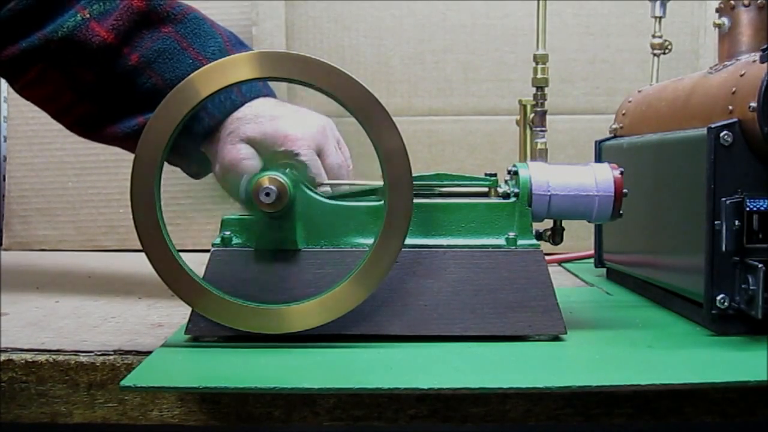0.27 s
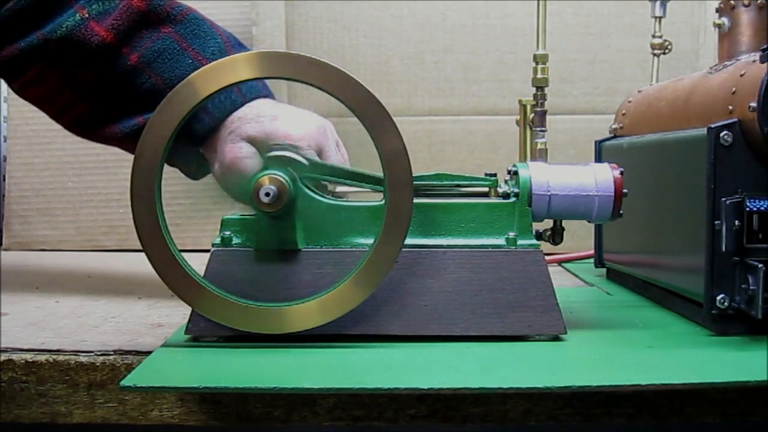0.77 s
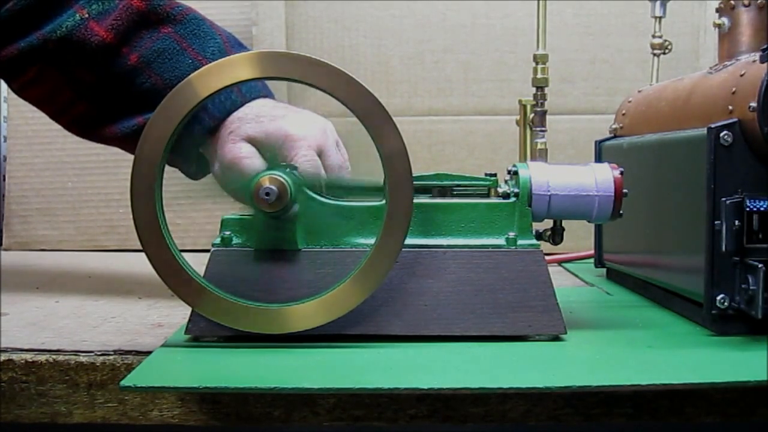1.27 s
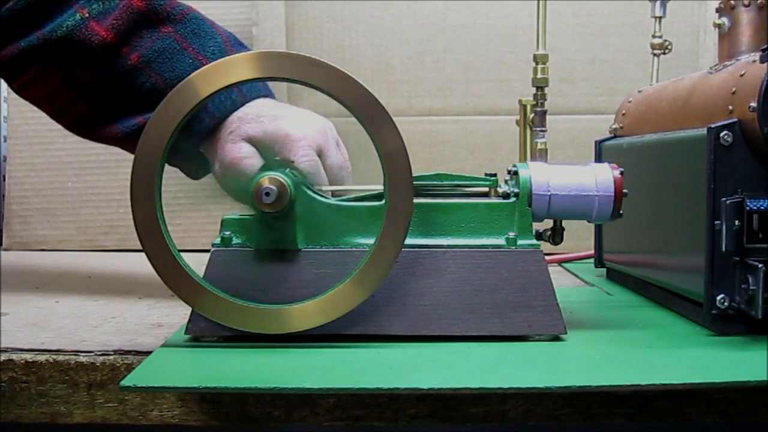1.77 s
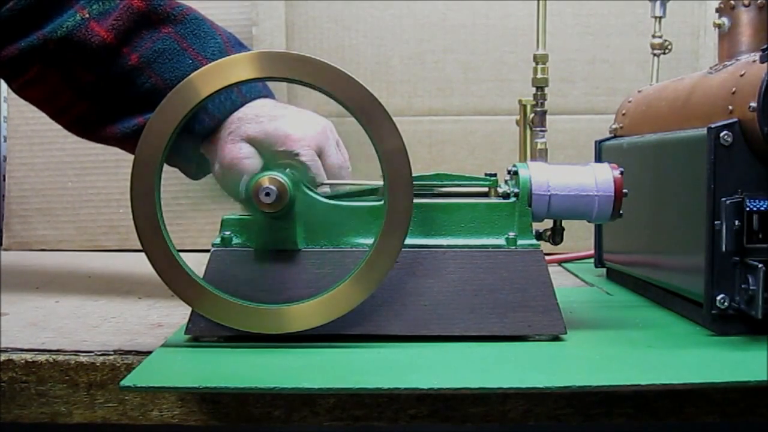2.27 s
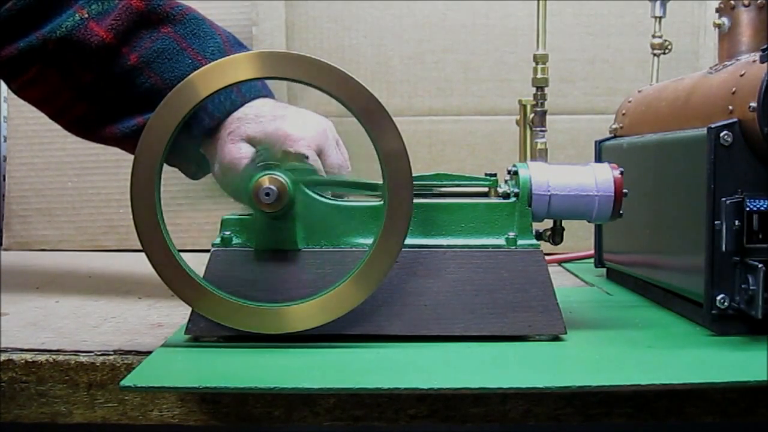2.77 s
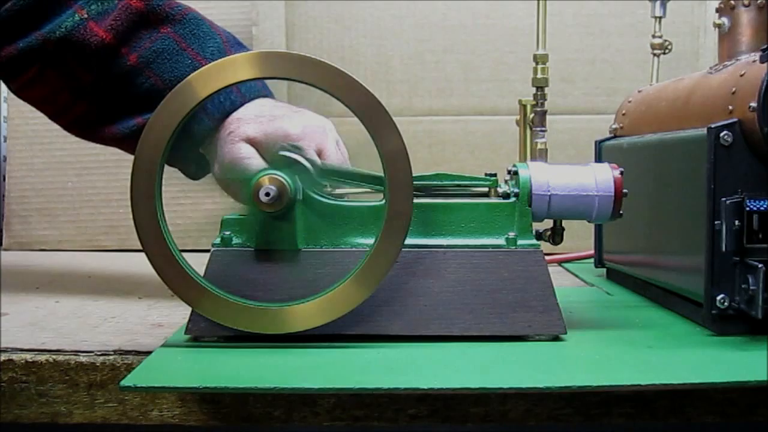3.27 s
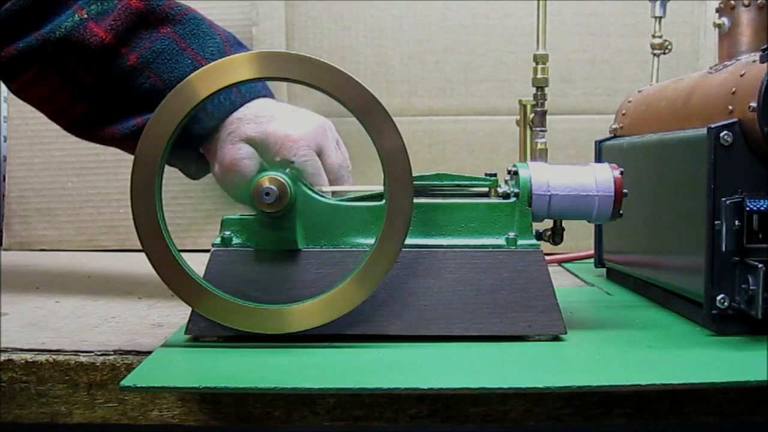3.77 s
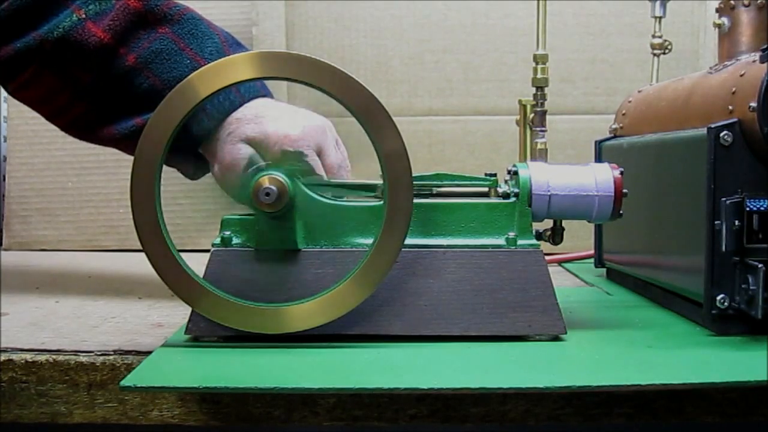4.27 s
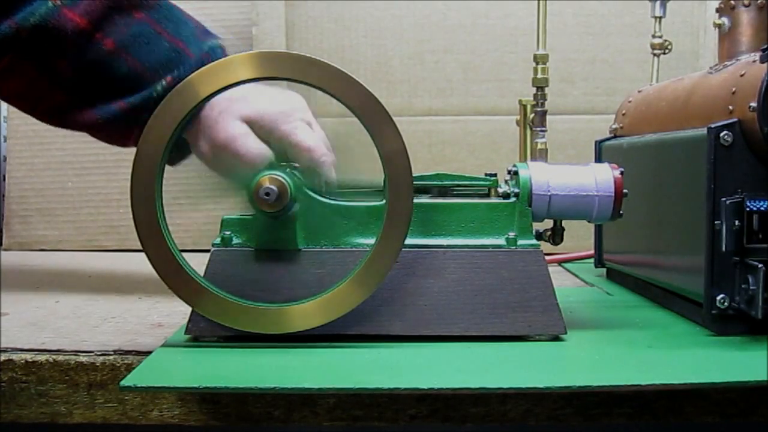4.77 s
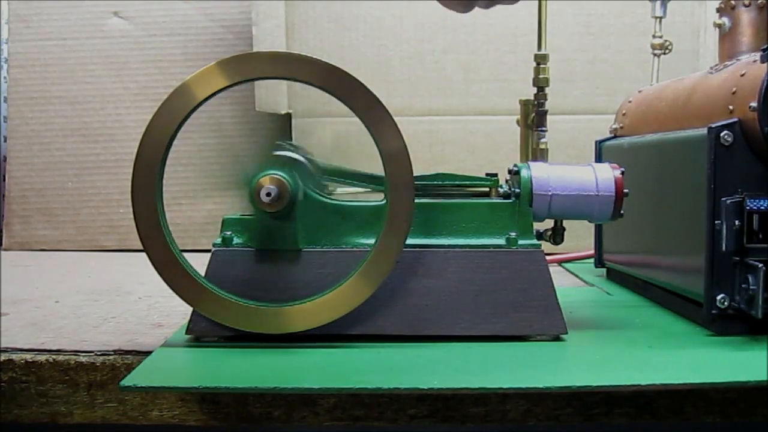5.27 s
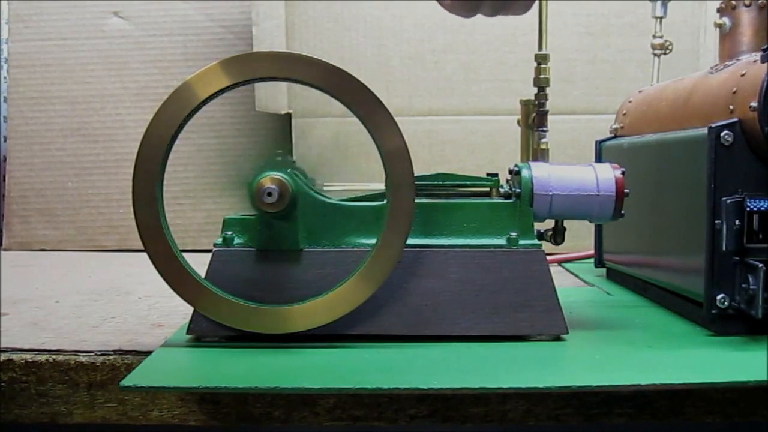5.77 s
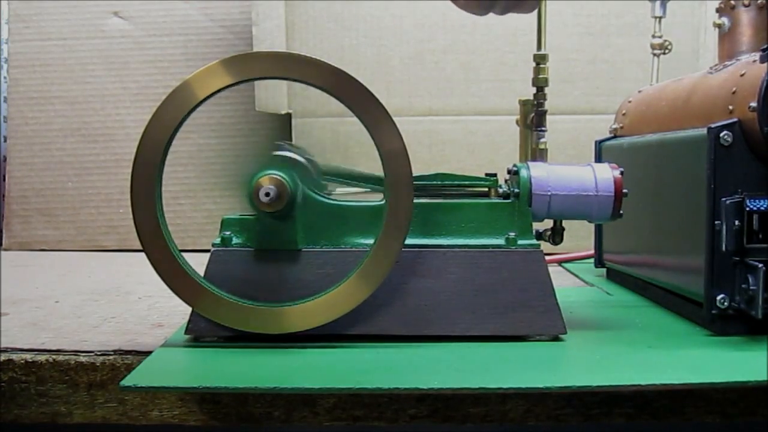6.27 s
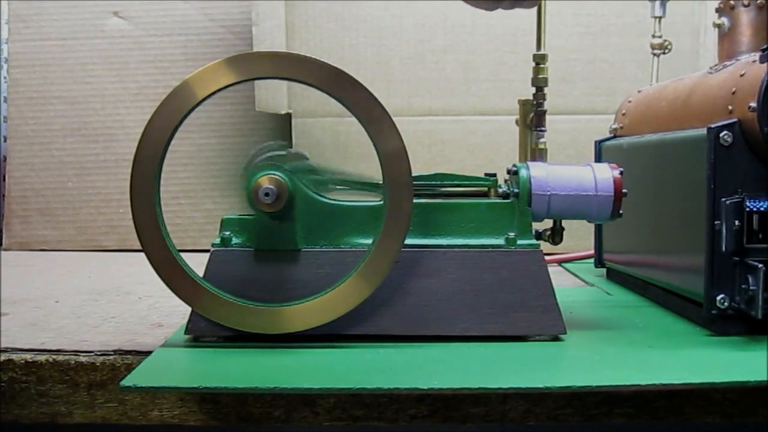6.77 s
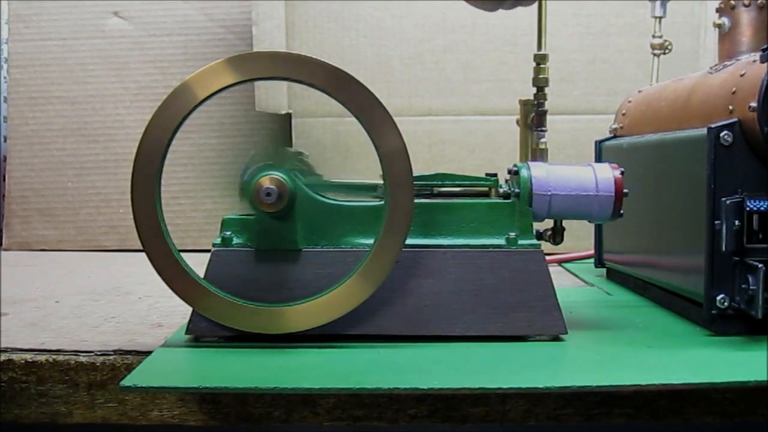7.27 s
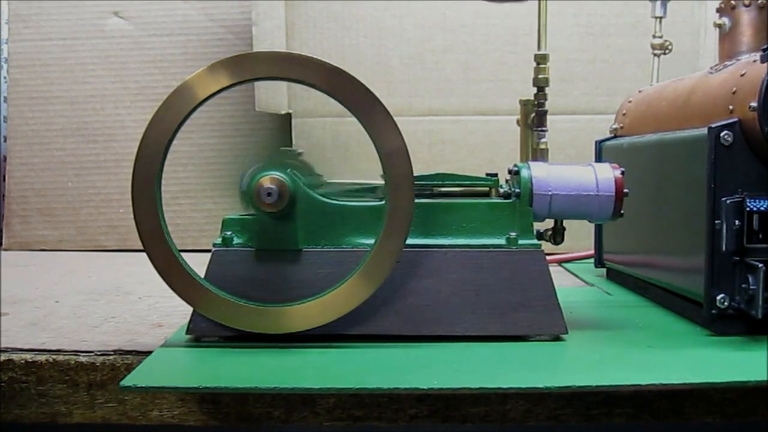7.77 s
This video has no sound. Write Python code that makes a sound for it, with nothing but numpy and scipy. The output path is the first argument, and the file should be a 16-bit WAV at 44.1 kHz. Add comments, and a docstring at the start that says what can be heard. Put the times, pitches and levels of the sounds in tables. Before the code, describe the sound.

A small model steam engine clatters in a fast, even two-knock metallic beat, then jumps to a quicker, brighter, looser rattle with hissing steam.

```python
"""Model steam engine on a bench

A model steam engine runs held back by a hand, then, after a cut that breaks the beat, runs free and speeds up.
Slack bearings knock at both dead centres: short metal rings, a bright crack, a reflection and a diffuse tail.
Valve gear ticks in between as small rattling contacts; steam is coloured noise swelling twice a turn.
Behind lie still air, a faint hum and a trembling bench; the tallest peaks are rounded off.
"""
import sys
import numpy as np
from scipy import signal
from scipy.fft import rfft, irfft, next_fast_len
from scipy.io import wavfile

SR = 44100
rng = np.random.default_rng(int(sys.argv[2]) if len(sys.argv) > 2 else 0)


def transcribe(signal):
    """Save signal, clipped to [-1, 1], as a 16-bit WAV file at the path in sys.argv[1]."""
    frames = np.atleast_2d(signal).T
    limited = np.clip(frames, -1, 1)
    pcm = np.round(limited * 32767).astype(np.int16)
    wavfile.write(sys.argv[1], SR, pcm)


N = 353241  # length in samples

# Side modes of the crank, beside a knock's main ring. Each row: pitch in Hz, swell time in s when loaded,
# relative level in dB under load, relative level in dB running free.
CRANK_MODES = [(783, 0.0015, -19, -13), (1098, 0.0032, -15.5, -20.5), (1873, 0.00065, -15, -5),
               (2110, 0.00039, -21, -13.5), (2771, 0.001, -21, -17.5), (3468, 0.0015, -22, -41),
               (3855, 0.00076, -24.5, -24)]
# Colour of the diffuse tail after a return knock or a tick. Each row: frequency in Hz, relative level in dB per Hz.
RETURN_TAIL = [(60, -21.5), (230, -4.5), (400, -6.5), (750, -1.5), (1300, 2), (2000, 1), (2600, -19.5),
               (3700, -12), (4700, -24), (6500, -36), (10000, -68), (15000, -56.2)]
FIRST_KNOCK_S, FREE_START_S = .0487, 4.9335  # first hard knock; cut to the free run, which starts on a hard knock
HELD_RATE = 6.68  # turns per s at which the parts are fully loaded


def amp(db):
    """Turn decibels into a plain gain."""
    return 10 ** (np.asarray(db) / 20)


def unit(x):
    """Scale a sound to rms 1."""
    return x / np.sqrt(np.mean(x ** 2) + 1e-20)


def along(points, hz):
    """Read values between (Hz, value) points on a log frequency axis."""
    f, v = np.transpose(points)
    return np.interp(np.log(hz + 1), np.log(f + 1), v)


def curve(rows):
    """Join (s, value) rows into one value per sample."""
    return np.interp(np.arange(N) / SR, *np.transpose(rows))


def noise(spectrum, size):
    """Noise of rms 1, coloured by (Hz, dB per Hz) points."""
    m = next_fast_len(size)
    white = rfft(rng.standard_normal(m))
    colour = amp(along(spectrum, np.fft.rfftfreq(m, 1 / SR)))
    return unit(irfft(white * colour, m)[:size])


def add(track, s, sound):
    """Mix a sound in at time s, cut off at the end of the track."""
    i = max(round(s * SR), 0)
    part = sound[:max(len(track) - i, 0)]
    track[i:i + len(part)] += part


def burst(x):
    """Give a short sound the energy of 8 ms at rms 1."""
    return x / np.sqrt(np.sum(x ** 2) / (.008 * SR))


def swell(t, rise):
    """Grow to 1 at time rise, then die away."""
    return t / rise * np.exp(1 - t / rise)


def speed(s):
    """Shaft speed in turns per second at time s, first held by the hand, then free."""
    # Speed while held. Each row: time in s, turns per s.
    held = [(0, 6.208), (.3, 6.959), (.95, 6.5), (1.3, 6.39), (2.25, 6.362), (2.8, 6.431), (4.65, 6.892),
            (4.9, 7.426)]
    # Speed in the free run. Each row: time in s, turns per s.
    free = [(4.9, 8.071), (6.15, 9.327), (6.7, 9.663), (8, 9.98)]
    return np.where(s < FREE_START_S, np.interp(s, *np.transpose(held)), np.interp(s, *np.transpose(free)))


def freedom(s):
    """How loose the parts are: 0 at the held speed or below, 1 at 9.6 turns per s or above."""
    free_rate = 9.6
    return np.clip((speed(s) - HELD_RATE) / (free_rate - HELD_RATE), 0, 1)


def runs():
    """Times and crank angle in turns of the held and the free run; whole turns fall on the hard knock."""
    step = .001  # s
    held_t = np.arange(0, FREE_START_S, step)
    free_t = np.arange(FREE_START_S, N / SR, step)

    def angle(t):
        """Add up the speed to get the turns made."""
        return np.r_[0, np.cumsum(speed(t[:-1] + step / 2)) * step]

    held_turns = angle(held_t)
    held_turns = held_turns - np.interp(FIRST_KNOCK_S, held_t, held_turns)
    return (held_t, held_turns), (free_t, angle(free_t))


def passes(shares):
    """Every time the crank passes a given share of its turn (one share held, one free)."""
    times = []
    for share, (t, turns) in zip(shares, runs()):
        wanted = np.arange(np.ceil(turns[0] - share), turns[-1] - share) + share
        times.append(np.interp(wanted, turns, t))
    return np.concatenate(times)


def workshop(air_db=-51):
    """Still air, a faint hum, and the bench trembling as the engine gathers speed."""
    # Steady hum tones. Each row: pitch in Hz, rms level in dB.
    hum_tones = [(236, -55), (475, -51), (514, -47)]
    # Colour of the still air. Each row: frequency in Hz, relative level in dB per Hz.
    air_colour = [(20, -16), (40, -19), (66, 4), (100, -1.5), (250, -15), (600, -22), (3000, -24),
                  (9000, -35), (15000, -36)]
    # Colour of the bench rumble. Each row: frequency in Hz, relative level in dB per Hz.
    rumble_colour = [(15, -1), (27, -14), (36, -9), (50, -20), (70, -1.5), (110, -11), (400, -42)]
    # Strength of the bench rumble. Each row: time in s, level in dB.
    rumble_level = [(0, -63), (5.2, -65), (5.9, -48.5), (6.6, -55), (8, -60)]
    t = np.arange(N) / SR
    hum = 0
    for hz, db in hum_tones:
        hum = hum + amp(db) * np.sqrt(2) * np.sin(2 * np.pi * (hz * t + rng.random()))
    air = amp(air_db) * noise(air_colour, size=N)
    rumble = amp(curve(rumble_level)) * noise(rumble_colour, size=N)
    return hum + air + rumble


def steam(puff_db=2.5, lead=0.025):
    """Steam and sliding parts rush, louder with speed, swelling twice a turn as the exhaust opens."""
    # Colour of the rush. Each row: frequency in Hz, relative level in dB per Hz.
    rush_colour = [(59, -53), (100, -17.5), (229, -8), (424, -13.5), (676, -1), (784, -3.5), (930, -6),
                   (1080, -5.5), (1310, -7.5), (2220, -4), (2370, -7.5), (3540, -15.5), (4570, -25),
                   (6020, -28), (16000, -60)]
    held_db, per_doubling_db = -35.5, 9  # level at the held speed; growth as the speed doubles
    t, turns = np.hstack(runs())
    flow_db = held_db + per_doubling_db * np.log2(speed(t) / HELD_RATE)
    puffs_db = puff_db * np.cos(2 * np.pi * 2 * (turns + lead))  # lead is a share of a turn
    return amp(curve(np.c_[t, flow_db + puffs_db])) * noise(rush_colour, size=N)


def wash(spectrum):
    """A diffuse tail: noise in which each frequency fades at its own pace."""
    # How fast the tail fades. Each row: frequency in Hz, time in s to fall by 60 dB.
    fade_times = [(100, 0.28), (1000, 0.24), (2500, 0.13), (6000, 0.32), (14000, 0.068)]
    hz, t, z = signal.stft(noise(spectrum, size=SR // 3), SR, nperseg=256)
    fade = amp(-60 * t / along(fade_times, hz)[:, None])
    tail = signal.istft(z * fade, SR, nperseg=256)[1]
    onset = 1 - np.exp(-np.arange(len(tail)) / SR / 0.0015)
    return (tail * onset)[:SR // 3]


def tails(spectrum, count, change=0.45):
    """One diffuse tail per blow: mostly the same paths, partly new ones as the parts move."""
    paths = np.array([wash(spectrum) for _ in range(8)])
    weights = np.c_[np.ones(count), change * rng.standard_normal((count, len(paths) - 1))]
    return weights / np.linalg.norm(weights, axis=1, keepdims=True) @ paths


def ringing(modes, free, scatter_db=2.0, slip=0.47):
    """Lightly damped modes, one row per blow, struck a little differently each time."""
    t = np.arange(SR // 3) / SR
    hz, t60, held_db, free_db = np.transpose(modes)
    level, phase = rng.standard_normal((len(free), 2, len(modes))).transpose(1, 0, 2)
    strike_db = held_db + np.outer(free, free_db - held_db) + scatter_db * level
    strike = amp(strike_db) * np.exp(1j * slip * phase)  # slip is the phase scatter in radians
    fade = amp(-60 * t / t60[:, None])
    onset = 1 - np.exp(-t / 0.00071)
    rings = fade * np.exp(2j * np.pi * hz[:, None] * t) * onset
    return (strike @ rings).imag


def clack(main_hz, main_rise, modes, free, linger, contact=0.00058):
    """Heavily damped metal modes; at speed the parts chatter together for longer."""
    t = np.arange(SR // 40) / SR
    stretch = 1 + linger * free
    hz, rise, held_db, free_db = np.transpose(modes)[:, :, None]
    level, detune = rng.standard_normal((2, len(modes), 1))
    gain = amp(held_db + free * (free_db - held_db) + 1.47 * level)
    side_hz = hz * (1 + 0.0031 * detune)
    sides = gain * swell(t, rise * stretch) * np.sin(2 * np.pi * side_hz * (t - main_rise))
    main = swell(t, main_rise * stretch) * np.sin(2 * np.pi * main_hz * (t - main_rise))
    cushion = 1 - np.exp(-(t / contact) ** 2)  # the oil film squeezes out before metal meets metal
    return burst(cushion * (main + sides.sum(0)))


def crack(t60):
    """The bright edge of steel meeting steel: noise that falls by 60 dB in t60 seconds."""
    t = np.arange(SR // 40) / SR
    colour = [(1500, -7.5), (3500, 5), (4800, -3.5), (7000, -4), (10000, -11), (15000, -27)]  # Hz, dB per Hz
    edge = noise(colour, size=len(t))
    onset = 1 - np.exp(-t / 0.00047)
    return burst(edge * amp(-60 * t / t60) * onset)


def rattle(free, spread=.006, fall_db=3, count=4):
    """A loose part touches, then skips a few times, each time more lightly."""
    track = np.zeros(SR // 16)
    delays = np.r_[0, np.sort(rng.uniform(0, spread, count - 1))]
    for k, delay in enumerate(delays):
        main_hz = 1400 * np.exp(rng.normal(0, 0.11))
        touch = clack(main_hz, 0.000702, CRANK_MODES, free, linger=1.0)
        add(track, delay, amp(-fall_db * k) * touch)
    return burst(track)


def valve_gear(tick_db=-0.5, wash_db=-8, jitter_s=.0008, scatter_db=3.0):
    """Light, rattling contacts near fixed crank angles, each with a crack and a tail."""
    # Small contacts. Each row: share of a turn held, share of a turn free, relative level in dB under load,
    # relative level in dB running free, crack level in dB relative to the tick.
    contacts = [(.08, .12, -30, -24, -25), (.182, .26, -19.5, -30.5, -25.5), (.46, .48, -26, -16.5, -27),
                (.545, .53, -33, -30, -34), (.765, .785, -28, -23, -18.5), (.89, .895, -24.5, -32.5, -20),
                (.945, 0.86, -26, -29, -29)]
    track = np.zeros(N)
    for *shares, held_db, free_db, bright_db in contacts:
        times = passes(shares)
        for due, free, tail in zip(times, freedom(times), tails(RETURN_TAIL, count=len(times))):
            s = due + rng.normal(0, jitter_s)
            level_db = held_db + free * (free_db - held_db)
            gain = amp(tick_db + level_db + rng.normal(0, scatter_db))
            add(track, s, gain * rattle(free))
            add(track, s, gain * amp(bright_db) * crack(0.07))
            add(track, s, gain * amp(wash_db) * tail)
    return track


def knocks(shares, by_speed, modes, spectrum, rise, linger, echo_s, echo_db,
           crack_t60, crack_db, bed_db, steel_db, wash_db, sizzle_db):
    """Bearing slack is taken up at a dead centre: clack, crack, a near reflection, ring and room."""
    # Long modes of bed, flywheel and bench. Each row: pitch in Hz, time in s to fall by 60 dB,
    # relative level in dB under load, relative level in dB running free.
    bed_modes = [(69, 0.17, -31, -30), (163.5, 0.11, -27, -23.5), (232.5, 0.11, -19, -23.5),
                 (311, 0.075, -31.5, -27.5), (521, 0.49, -37, -32), (797.5, 0.11, -12, -10),
                 (904, 0.13, -16, -18), (1050, 0.12, -40, -30), (1081.5, 0.15, -9.5, -13.5),
                 (1092, 0.092, -32, -25), (1298, 0.27, -27, -28), (1360, 0.18, -13.5, -17),
                 (1549, 0.1, -15.5, -8), (1783, 0.23, -17.5, -19), (1935, 0.16, -15, -12.5),
                 (1970, 0.37, -22.5, -24), (2035, 0.26, -31, -24), (2185, 0.13, -9, -16.5),
                 (2245, 0.15, -20, -13), (2742, 0.068, -12, -22), (2947, 0.068, -36, -11),
                 (3660, .1, -22, -31), (3980, 0.17, -35, -23), (4140, 0.16, -39, -30)]
    # Thin high modes of the steel rods. Each row: pitch in Hz, time in s to fall by 60 dB,
    # relative level in dB under load, relative level in dB running free.
    steel_modes = [(5590, 0.041, -1, -11), (5950, 0.1, -7.5, -13), (6240, 0.079, -11, -12),
                   (7170, 0.082, -30, -12.5), (7840, 0.075, -14, -19), (9260, .06, -34, -18),
                   (9650, 0.045, -15, -22)]
    treble = [(2000, -15), (4500, -4.5), (6500, -8), (10000, -11.0), (15000, -22)]  # Hz, dB per Hz
    track, times = np.zeros(N), passes(shares)
    rates, *columns = np.transpose(sorted(by_speed))
    db, main_hz, edge_db, free = [np.interp(speed(times), rates, column) for column in columns]
    free = np.clip(free, 0, 1)

    # no two knocks are quite alike
    force, detune, snap = rng.standard_normal((len(times), 3)).T
    db = db + 0.72 * force
    main_hz = main_hz * (1 + .014 * detune)
    edge_db = edge_db + 1 * snap

    body = amp(bed_db) * ringing(bed_modes, free) + amp(wash_db) * tails(spectrum, count=len(times))
    sheen = amp(steel_db) * ringing(steel_modes, free) + amp(sizzle_db) * tails(treble, count=len(times))
    for k, s in enumerate(times):
        blow = amp(db[k]) * clack(main_hz[k], rise, modes, free[k], linger)
        add(track, s, blow)
        add(track, s + echo_s, amp(echo_db - 4.2 * free[k]) * blow)  # the reflection, weaker when loose
        add(track, s, amp(edge_db[k] + crack_db) * crack(crack_t60))
        add(track, s, amp(db[k]) * body[k] + amp(edge_db[k]) * sheen[k])
    return track


def scene():
    """Both knocks of each turn over the valve gear, the steam and the workshop."""
    # Side modes of the rod. Each row: pitch in Hz, swell time in s when loaded,
    # relative level in dB under load, relative level in dB running free.
    rod_modes = [(842, 0.0018, -9.5, -5.5), (1243, 0.0028, -11.5, -4), (1768, 0.0017, -7, 0.5),
                 (2254, 0.0061, -28, -20), (2543, 0.0054, -19.5, -25), (3005, 0.0026, -24.5, -17.5),
                 (3760, 0.00023, -21.4, -16.5)]
    # Colour of the tail after a hard knock. Each row: frequency in Hz, relative level in dB per Hz.
    hard_tail = [(60, -40), (230, -12.5), (400, -14.5), (750, -16), (1300, -6.5), (2000, 4.5), (2600, -4),
                 (3700, -9.5), (4700, -20), (6500, -25.5), (10000, -46), (15000, -39)]
    # The hard knock that starts each turn. Each row: speed in turns per s, typical level in dB,
    # typical main ring in Hz, typical crack level in dB before its trim, looseness from 0 to 1.
    hard_knock = [(6.4, -10.5, 1456, -34.5, 0.19), (6.8, -9.5, 1430, -34, 0.06), (7.3, -11, 1410, -40, .1),
                  (8.3, -10.5, 1350, -33, 0.44), (9.05, -9.5, 1330, -26.5, 0.7), (9.3, -11.5, 1460, -25, 1),
                  (9.7, -8, 1436, -23.5, 1), (10, -9.5, 1450, -26.5, 1)]
    # The duller knock of the return stroke. Each row: speed in turns per s, typical level in dB,
    # typical main ring in Hz, typical crack level in dB before its trim, looseness from 0 to 1.
    return_knock = [(6.4, -17.5, 1090, -53, .02), (6.85, -17, 1100, -48, 0.055),
                    (7.3, -14.7, 1220, -43, .4), (8.4, -14, 1290, -49, 0.53), (9.2, -13, 1260, -40, 0.68),
                    (9.7, -12.5, 1070, -39, 0.89), (10, -14.3, 1000, -37.5, 0.89)]
    return_shares = (.418, .429)  # share of a turn, held and free

    background = workshop() + steam() + valve_gear()
    back = knocks(return_shares, return_knock, rod_modes, RETURN_TAIL, rise=0.000983, linger=0.13,
                  echo_s=0.00375, echo_db=-5, crack_t60=0.025, crack_db=-1,
                  bed_db=0.0, steel_db=0, wash_db=-14, sizzle_db=-11)
    out = knocks((0, 0), hard_knock, CRANK_MODES, hard_tail, rise=0.000576, linger=0.84,
                 echo_s=.0039, echo_db=-13.5, crack_t60=0.012, crack_db=0.0,
                 bed_db=-2.0, steel_db=3, wash_db=-10.5, sizzle_db=-12.5)
    return (background + back + out)[None]


def record(dry):
    """A close microphone rounds off the tallest peaks; then all above the band limit is removed."""
    top_hz = 15900
    clipped = dry / (1 + dry ** 8) ** (1 / 8)
    m = next_fast_len(N + SR // 2)
    kept = np.fft.rfftfreq(m, 1 / SR) < top_hz
    return irfft(rfft(clipped, m) * kept, m)[..., :N]


dry = scene()
out = record(dry)
transcribe(out)
```